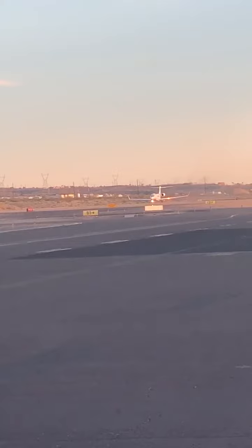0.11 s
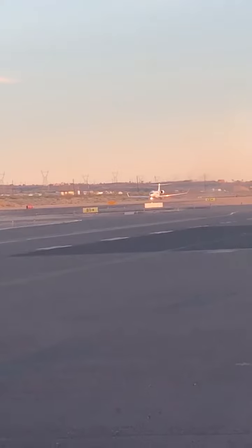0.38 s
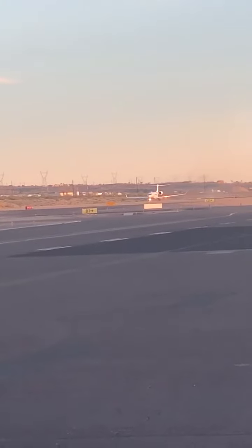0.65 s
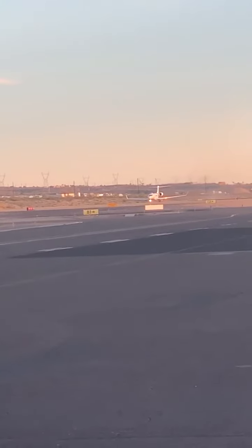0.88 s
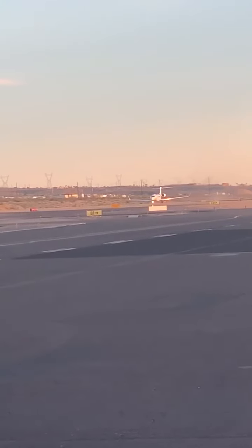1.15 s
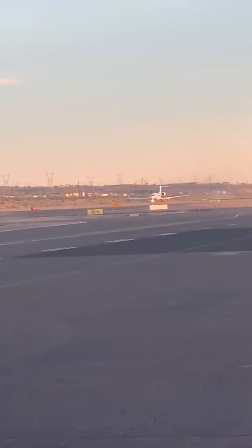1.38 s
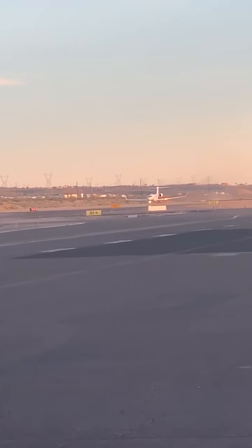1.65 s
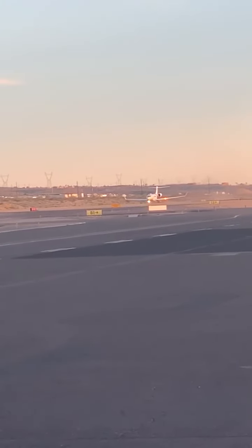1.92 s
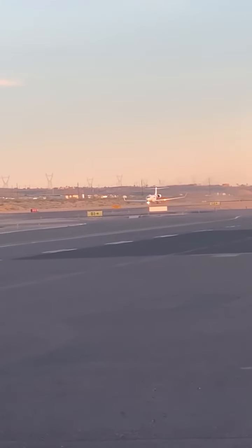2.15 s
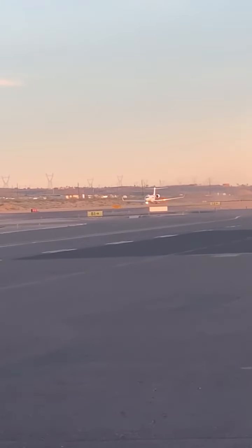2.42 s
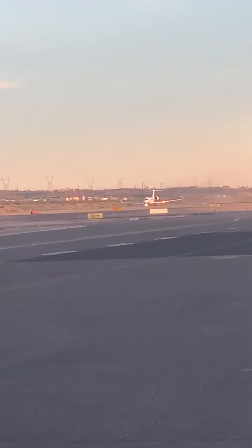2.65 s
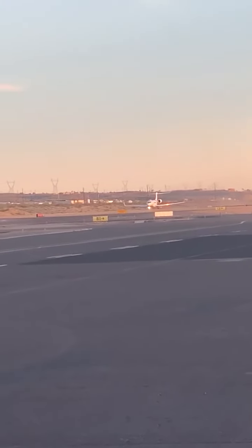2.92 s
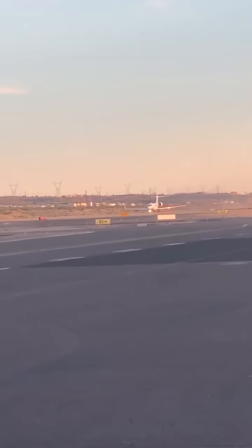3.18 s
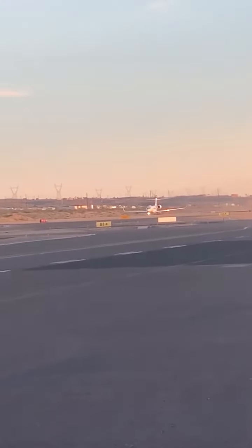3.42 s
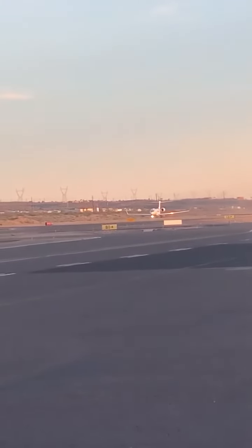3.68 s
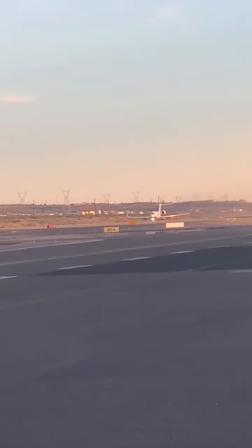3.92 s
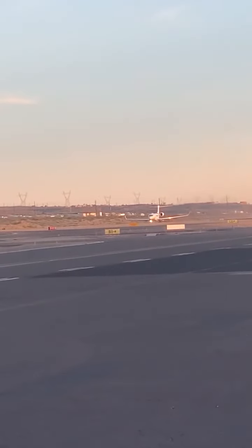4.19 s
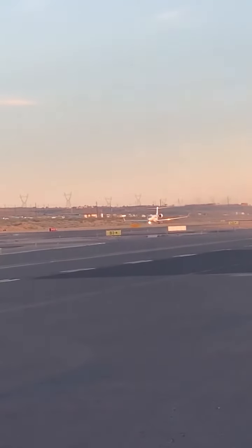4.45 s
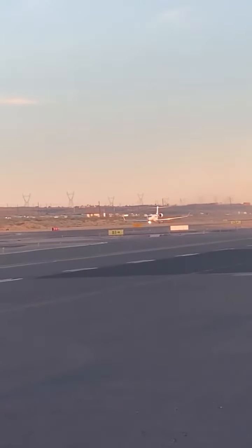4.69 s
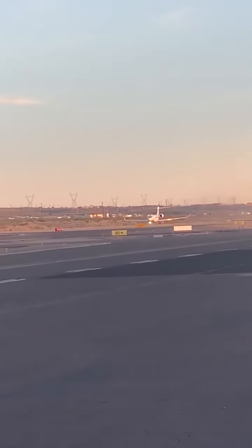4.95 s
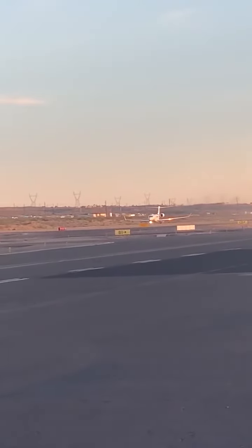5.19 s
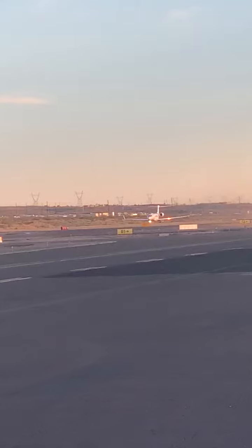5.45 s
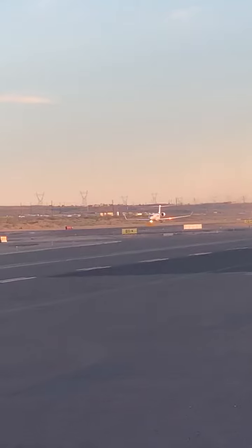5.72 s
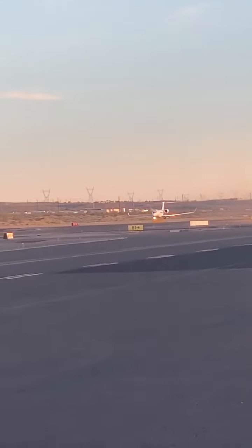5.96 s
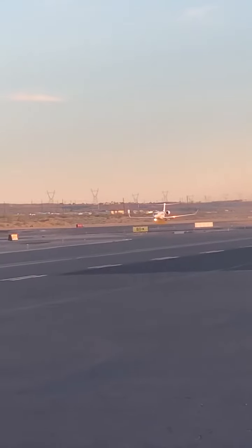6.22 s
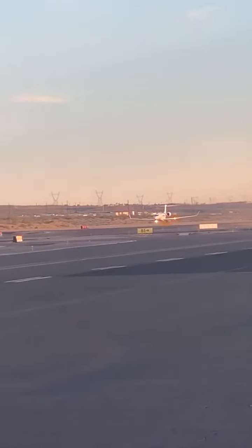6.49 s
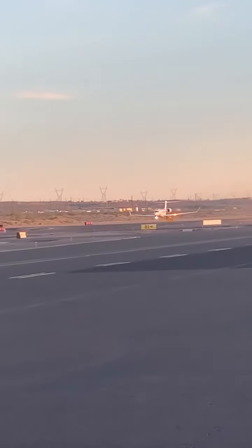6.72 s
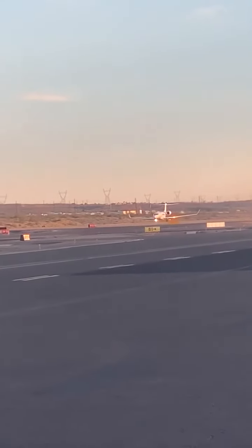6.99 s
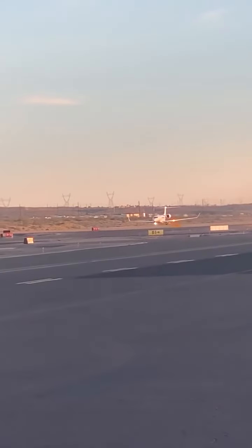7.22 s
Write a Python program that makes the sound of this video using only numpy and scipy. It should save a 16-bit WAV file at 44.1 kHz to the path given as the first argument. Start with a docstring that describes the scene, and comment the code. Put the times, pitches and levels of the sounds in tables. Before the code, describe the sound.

On an open airfield, a six-cylinder diesel idles close by on the right, droning low with fast uneven knocks, metallic rattle and airy fan noise. Far across the tarmac, a small jet makes a deep, wavering roar that swells slightly at the end. A faint, very brief whistle slips by near five seconds. Handheld stereo phone, outdoors and dry.

```python
"""An open airfield, heard through a phone: far across the tarmac a jet rolls for take-off with a low roar,
made of shaped noise. Close by, off to the right, a six-cylinder diesel idles: cosine exhaust tones, ringing
knocks, fan and casing noise, and a thin rasp. A brief sliding tone makes a faint whistle, and faint high hiss
lies in bands. The two microphone ports hear jet and diesel with different delays and dips."""
import sys
import numpy as np
from scipy import signal
from scipy.fft import rfft, irfft
from scipy.io import wavfile
from scipy.ndimage import uniform_filter1d, map_coordinates

SR = 44100
rng = np.random.default_rng(int(sys.argv[2]) if len(sys.argv) > 2 else 0)


def to_wav(s):
    """Save 16-bit WAV."""
    ch = np.atleast_2d(s).T  # columns
    pcm = np.round(np.clip(ch, -1, 1) * 32767)  # PCM
    wavfile.write(sys.argv[1], SR, pcm.astype(np.int16))


def nominal_scale(level):
    """Amplitude ratio for a level in decibels (scalar or array-like)."""
    x = np.asarray(level, float) / 20
    return 10 ** x


N = 324576

# force of each cylinder in firing order, before treble and scatter: level/dB
CYLINDER_DB = [-56.5, -53.5, -49, -56, -53, -49]
KNOCK_AT = 0.65  # place of the knock within each firing period (0-1)


def column(table, k, at, log=False):
    """One column of a table, joined by straight lines."""
    table = np.array(table, float)
    if log:
        return np.interp(np.log(at + 1), np.log(table[:, 0]), table[:, k])
    return np.interp(at, table[:, 0], table[:, k])


def noise(spectrum):
    """Two unrelated noises with the given dB per Hz."""
    hz = np.fft.rfftfreq(N, 1 / SR)
    gain = nominal_scale(column(spectrum, 1, hz, log=True)) * np.sqrt(SR / 2)
    return irfft(rfft(rng.standard_normal((2, N))) * gain, N)


def walk(rate):
    """Random levels held 1 / rate s and slewed twice; spread near 1."""
    hold = int(SR / rate)
    steps = np.repeat(rng.standard_normal(N // hold + 1), hold)
    return 1.35 * uniform_filter1d(uniform_filter1d(steps, hold), hold)[:N]


def jet_roar(time):
    """Low noise of the distant jet, swelling and wavering with air turbulence on the long path."""
    # spectrum of the roar before its swell: f/Hz, level/dB per Hz
    spectrum = [(20, -81), (45, -58.5), (65, -48), (105, -44), (150, -42), (185, -49.5), (230, -53),
                (300, -64.5), (380, -78), (600, -100), (1200, -160)]
    # swell of the roar: t/s, level/dB
    swell = [(0, -5), (.5, 0.5), (.8, -2.5), (1.2, -2), (1.7, -4), (3.1, -0.5), (3.5, -4), (4.2, -2.5),
             (4.35, 0), (4.55, -2.5), (4.9, -4), (5.7, -1), (6.5, -0.5), (6.9, -1.5), (7.36, 2.5)]
    level_db = column(swell, 1, time) + 0.3 * walk(10.0)
    return noise(spectrum) * nominal_scale(level_db)


def idle_firings(time):
    """Running count of firings, from the idle speed as the governor hunts."""
    # idle speed: t/s, firings per second/Hz
    speed = [(0, 30.751), (1.3, 30.734), (3.1, 30.828), (4.6, 30.764), (7.4, 30.838)]
    return 0.077 + np.cumsum(column(speed, 1, time)) / SR


def diesel_treble(time):
    """Level in dB that guides the diesel's treble, which fades in waves."""
    # treble guide, scaled apart for knock and rasp: t/s, level/dB
    waves = [(0, 8.5), (.9, 4.5), (1.5, 0), (2.1, 3), (2.45, 1.5), (2.6, 6), (2.85, 5.5), (3.3, 4.5),
             (3.8, -5), (4.4, 0.5), (4.75, -1), (4.95, 4), (5.2, -1.5), (5.6, -3), (6.2, -2), (7.36, -6)]
    return column(waves, 1, time)


def tones(time, firings):
    """Exhaust and casing tones locked to the firing rate; the lower ones come out later."""
    # exhaust and casing tones before wavering: multiple of the firing rate, level/dB rms
    main_tones = [(2, -30.5), (3, -37), (4, -33.5), (5, -33), (7, -53.5), (9, -52), (10, -61)]
    # weaker casing tones, some once a crank turn: multiple of the firing rate, level/dB rms before wavering
    weak_tones = [(32 / 3, -62), (11, -62), (16, -58), (49 / 3, -62), (50 / 3, -63), (52 / 3, -59),
                  (58 / 3, -62)]
    # slow waxing and waning of three tones: t/s, third/dB, fourth/dB, fifth/dB
    order_swell = [(0, 2.5, -5, -9), (1.5, 2.5, 1.5, -1.5), (2.6, -3.5, -3, -4), (3.5, 2.5, 4, -7.5),
                   (4.4, 1.5, 3, 0), (5.5, 2.5, 1.5, 0), (6.5, 3, -3, -2.5), (7.36, -8.5, 3, -5.5)]
    turning_order, phase_spread = 3.9, 0.9  # multiple of the firing rate; rad per order squared
    out = 0
    for order, db in [*main_tones, *weak_tones]:
        phase_lead = phase_spread * (order - turning_order) ** 2 - np.pi
        if order in (3, 4, 5):
            db = db + column(order_swell, order - 2, time)
        level = nominal_scale(db + 2.1 * walk(4.7)) * np.sqrt(2)
        out = out + level * np.cos(2 * np.pi * order * firings + phase_lead)
    return out


def knocks(time, firings, treble_db):
    """Firings, valve taps and loose rattling parts set the block's modes ringing; the two outputs differ in phase."""
    # ringing modes of the block: f/Hz, level/dB before tilt and scatter, time to fall 60 dB/s
    block = [(1525, -3.5, 0.022), (1724, -4, 0.015), (2092, -3.5, 0.021), (2710, -7.5, 0.02),
             (2948, -7, 0.014), (3168, -4.5, 0.02), (3686, -15.5, 0.023), (4280, -14, 0.0052),
             (6200, -28, 0.0032)]
    # knocks that stand out, loud or bright:
    # t/s, level/dB before colour and scatter, highest mode above that level/dB
    marked_knocks = [(.0837, -40, -31), (.1481, -41, -35), (.376, -41.5, -32), (.5402, -45, -27),
                     (.7672, -46, -22), (1.8736, -49, -23), (2.4254, -43.5, -40), (2.5237, -50.5, -38),
                     (2.9133, -48, -26), (3.1098, -45, -45), (3.3034, -48, -40), (4.2767, -47, -31),
                     (5.0564, -52, -18), (6.6144, -45, -33), (6.712, -51, -28), (6.972, -45.5, -43),
                     (7.0993, -48.5, -28), (0.2798, -42.5, -19.5), (0.5756, -55.5, -2),
                     (0.6714, -41.5, -15), (0.7352, -44.5, -42), (0.8335, -46.5, -41), (0.9632, -38, -50),
                     (1.1598, -45, -14.5), (1.3533, -41.5, -44), (1.4526, -44, -18), (1.8422, -44.5, -13),
                     (2.3286, -38.5, -53), (2.6204, -43, -41), (2.8155, -48, -9), (3.0106, -44.5, -27),
                     (3.3992, -50.5, -26), (4.9594, -51, -8.5), (5.9344, -42, -38.5), (6.0302, -48, -43),
                     (6.095, -46, -42.5), (6.127, -45, -44.5), (6.322, -44.5, -35), (6.4193, -47, -42)]
    valve_at, valve_db = 0.23, -56  # place in the next firing period (0-1), dB before treble and scatter
    rattle_per_s, rattle_db, rattle_scatter_db = 200, -63, 6
    knock_scatter_db, mode_scatter_db, marked_scatter_db = 2.5, 3.5, 1.5
    knock_per_treble = 0.65  # dB for each dB of treble
    tilt_per_treble, tilt_per_force = 0.69, 0.73  # dB per octave for each dB; harder blows are brighter
    loud_mode, loud_mode_db = 5, 4  # marked knocks favour this mode, counted from 0

    number = np.arange(int(firings[-1]))
    loose = rng.random(int(rattle_per_s * time[-1])) * firings[-1]
    place = np.concatenate([number + KNOCK_AT, number + 1 + valve_at, loose])
    at = np.minimum((np.interp(place, firings, time) * SR).astype(int), N - 1)
    firing_db = np.take(CYLINDER_DB, number % 6)
    tap_db = np.full(len(number), valve_db)
    loose_db = rattle_db + rattle_scatter_db * (2 * rng.random(len(loose)) - 1)
    blow_db = np.concatenate([firing_db, tap_db, loose_db])
    chance = rng.standard_normal((len(at), len(block) + 1))
    tilt = tilt_per_treble * treble_db[at] + tilt_per_force * (blow_db - max(CYLINDER_DB))
    blow_db = blow_db + knock_per_treble * treble_db[at] + knock_scatter_db * chance[:, -1]

    # every blow lands a little differently and shares its force anew among the modes
    mode_hz, mode_db, _ = np.transpose(block)
    colour_db = mode_db + np.outer(tilt, np.log2(mode_hz / 3180))
    ring_db = blow_db[:, None] + colour_db + mode_scatter_db * chance[:, :-1]
    colour_limit_db = mode_db - (mode_hz < 3050)  # 1 dB less for the lower modes
    for s, db, top_db in marked_knocks:
        nearest = np.argmin(abs(at[:len(number)] / SR - s))
        marked_colour_db = np.minimum(colour_db[nearest], colour_limit_db)
        ring_db[nearest] = db + marked_colour_db + marked_scatter_db * chance[nearest, :-1]
        ring_db[nearest, -1] = db + top_db
        ring_db[nearest, loud_mode] += loud_mode_db

    turn = np.exp(2j * np.pi * rng.random((len(at), 2, len(block))))  # random starting phases
    rise = signal.windows.hann(int(0.003 * SR))  # the pressure builds over a few ms
    out = 0
    for k, (hz, _, t60) in enumerate(block):
        blows = np.zeros((2, N), complex)
        blows[:, at] = turn[:, :, k].T * nominal_scale(ring_db[:, k])
        jolt = rise * np.exp(2j * np.pi * hz * np.arange(len(rise)) / SR) / rise.sum()
        pole = np.exp(2j * np.pi * hz / SR - np.log(1000) / (t60 * SR))
        push = signal.oaconvolve(blows, jolt[None])[:, :N]
        out = out + signal.lfilter([1], [1, -pole], push).imag
    return out


def casing(time):
    """Fan and casing noise, cut into bands that drift and flicker alone as the phone pans."""
    # spectrum before the level changes below: f/Hz, level/dB per Hz
    spectrum = [(300, -75), (380, -74.5), (490, -66), (590, -65.5), (700, -65), (790, -72.5), (900, -77),
                (1110, -70.5), (1370, -82.5), (1540, -85.5), (1850, -87.5), (2100, -84), (2350, -93),
                (2750, -89.5), (3200, -97), (3500, -106), (4000, -125), (5000, -150)]
    # bands of the noise: upper edge f/Hz, drift/dB per s, flicker/dB
    humps = [(583, 0.5, -0.5), (860, -0.17, 1.27), (1470, 0.52, 0.24), (1880, 0.5, 0.96), (2435, 1.74, 2.5),
             (8000, -0.4, 1)]
    hz = np.fft.rfftfreq(N, 1 / SR)
    whole = rfft(noise(spectrum))
    out, low = 0, 0
    for top_hz, drift_db, flicker_db in humps:
        drift = drift_db * (time - time[-1] / 2)
        level_db = -2.5 + drift + flicker_db * walk(14) + 0.93 * walk(6)
        band = irfft(whole * ((hz >= low) & (hz < top_hz)), N)
        out = out + band * nominal_scale(level_db)
        low = top_hz
    return out


def gas_rasp(firings, treble_db):
    """Thin gas noise above the casing noise, jumping at each firing and following the treble."""
    # spectrum before the level changes below: f/Hz, level/dB per Hz
    spectrum = [(3000, -116), (3500, -106), (3900, -103), (4300, -105), (4650, -108), (4950, -119),
                (5700, -123), (6200, -130), (7000, -160)]
    rasp_per_treble, rasp_per_force = 0.79, 3.9  # dB for each dB of treble or cylinder force
    cylinder = np.floor(firings - KNOCK_AT).astype(int) % 6
    force_db = np.take(CYLINDER_DB, cylinder) - max(CYLINDER_DB)
    fade = np.exp(-((firings - KNOCK_AT) % 1) / 0.13)  # 0.13 of a firing period
    burst = nominal_scale(rasp_per_force * force_db - 0.5) * fade
    puff = 0.68 + uniform_filter1d(burst, size=60)
    level_db = rasp_per_treble * treble_db + 3 * walk(50) + 0.7 * walk(7.0)  # quick flicker, slower gusts
    return noise(spectrum) * nominal_scale(level_db) * puff


def high_hiss():
    """Faint high hiss in bands, one part alike on both sides, one part opposite."""
    # hiss alike on both sides: f/Hz, level/dB per Hz
    alike = [(5400, -150), (5800, -125), (8700, -126), (9000, -146), (10300, -146), (10600, -128),
             (11400, -125), (13500, -126), (14400, -134), (14600, -150)]
    # hiss opposite on the two sides: f/Hz, level/dB per Hz
    opposite = [(7400, -146), (8300, -125), (11000, -126), (11800, -150), (13000, -150), (14000, -127),
                (15200, -133), (15300, -150)]
    return noise(alike)[0] + noise(opposite)[0] * np.array([[1], [-1]])


def whistle(time):
    """A faint, brief passing sine that slides in pitch while its level breaks up."""
    # path of the whistle: t/s, f/Hz, level/dB rms
    path = [(4.81, 978, -78), (4.85, 992, -58), (4.888, 1012, -76), (4.92, 1028, -60), (4.955, 968, -65),
            (4.99, 950, -80)]
    heard = (time > path[0][0]) & (time < path[-1][0])
    phase = 2 * np.pi * np.cumsum(column(path, 1, time)) / SR
    return heard * nominal_scale(column(path, 2, time)) * np.sqrt(2) * np.sin(phase)


def ports(direct, stray):
    """The left port hears the direct sound late and coloured, topped up by stray sound of its own."""
    # lag of the left port behind the right, before panning: f/Hz, phase/rad
    port_lag = [(30, .1), (190, .5), (340, 1.3), (490, 2.7), (770, 7.8), (1030, 9.7), (1370, 12.6),
                (1750, 10.7), (2130, 9.9), (2700, 12.6), (3450, 14.7), (3620, 13.8), (3960, 15.4),
                (4280, 16.4), (4500, 15.8), (5500, 15.6), (6200, 18.7)]
    # left port between its dips: f/Hz, level/dB, shared power/0-1
    port_tone = [(30, -1, .94), (190, -1.9, .99), (340, .1, .91), (1000, -.1, .85), (2700, .6, .88),
                 (4900, -.9, .85), (6300, 0, .9)]
    # places where the left port dips or shares less with the right:
    # f/Hz, half width/Hz, level/dB, shared power lost/0-1
    port_dips = [(620, 145, -13.3, .5), (1570, 230, -10.5, .62), (2400, 280, 0, .35), (3570, 250, -3.8, .7),
                 (4380, 260, -4.5, .15), (5600, 500, 0, .72)]
    hz = np.fft.rfftfreq(N, 1 / SR)
    lag = column(port_lag, 1, hz)
    db, share = column(port_tone, 1, hz), column(port_tone, 2, hz)
    for dip_hz, width, dip_db, lost in port_dips:
        depth = np.clip(1 - abs(hz - dip_hz) / width, 0, 1)
        db, share = db + dip_db * depth, share - lost * depth
    share = np.clip(share, 0, 1)
    late = np.sqrt(share) * np.exp(-1j * lag) * rfft(direct)
    own = np.sqrt(1 - share) * rfft(stray)
    left = irfft(nominal_scale(db) * (late + own), N)
    sample = np.arange(N)
    pan_lag = -7e-6 * (sample - N / 2)  # in samples: the lag shrinks a little as the phone pans
    left = map_coordinates(left, [sample - pan_lag], mode="mirror")
    return np.array([left, direct])


def scene():
    """Jet and diesel through the two ports, with the high hiss and the whistle added."""
    time = np.arange(N) / SR
    firings = idle_firings(time)
    treble_db = diesel_treble(time)
    both = jet_roar(time) + knocks(time, firings, treble_db) + casing(time) + gas_rasp(firings, treble_db)
    direct = both[0] + tones(time, firings)
    return ports(direct, both[1]) + high_hiss() + whistle(time)


def top_cut(x):
    """Nothing passes above the cut-off."""
    return signal.sosfilt(signal.butter(12, 15100, fs=SR, output="sos"), x)


def record(dry):
    """A very faint copy of the sound, mostly its strong bass, sits around a quarter of the sample rate."""
    mirror = nominal_scale(-64.5) * np.cos(np.pi / 2 * np.arange(N))
    mix = dry * (1 + mirror)
    return top_cut(mix)


dry = scene()
out = record(dry)
to_wav(out)
```